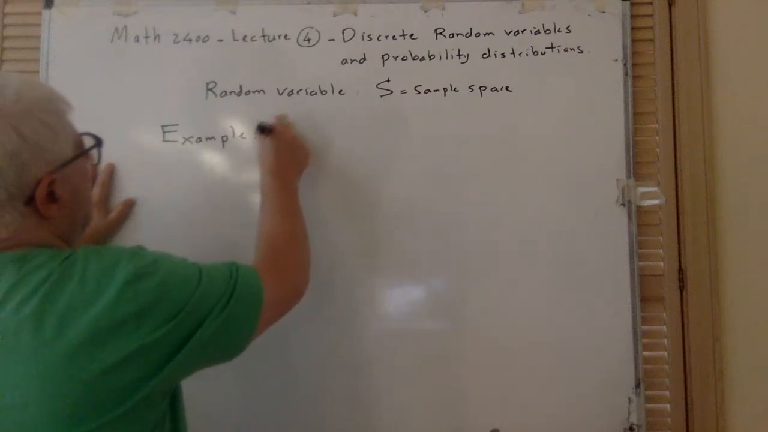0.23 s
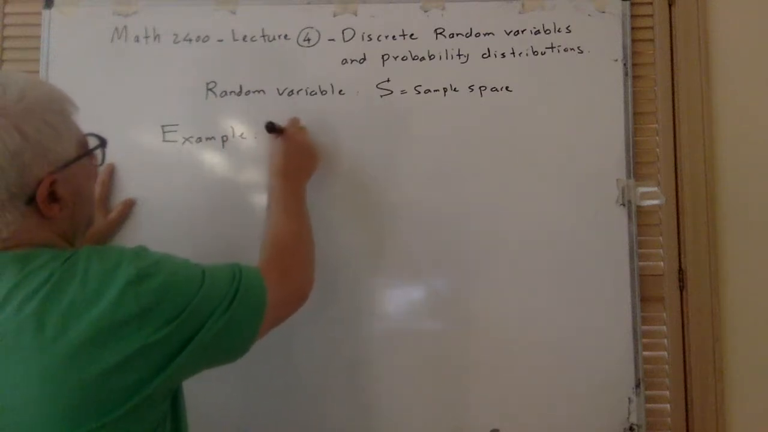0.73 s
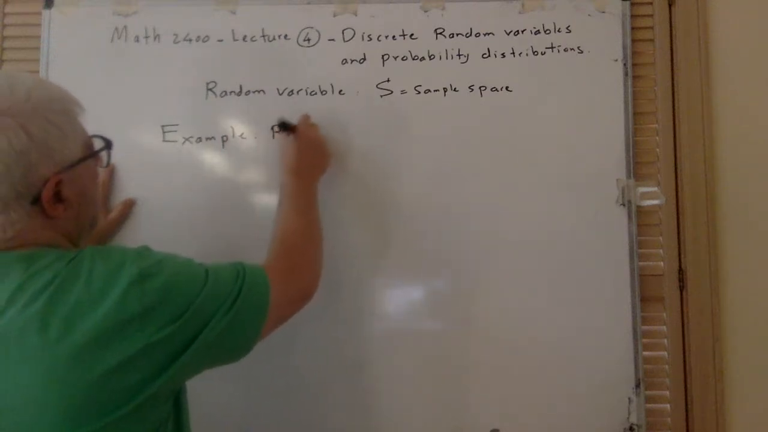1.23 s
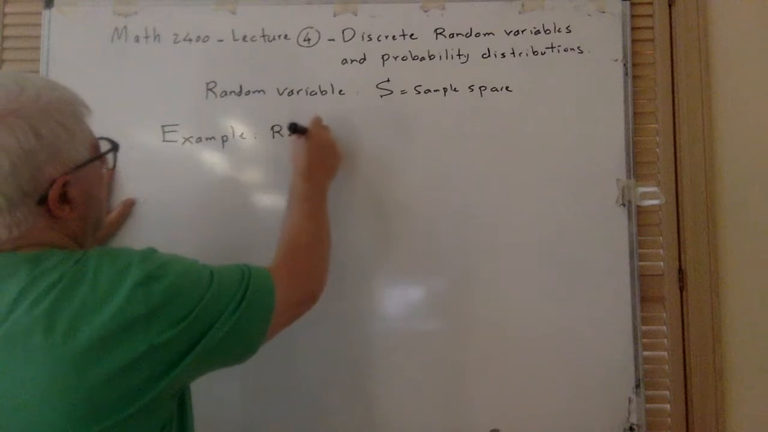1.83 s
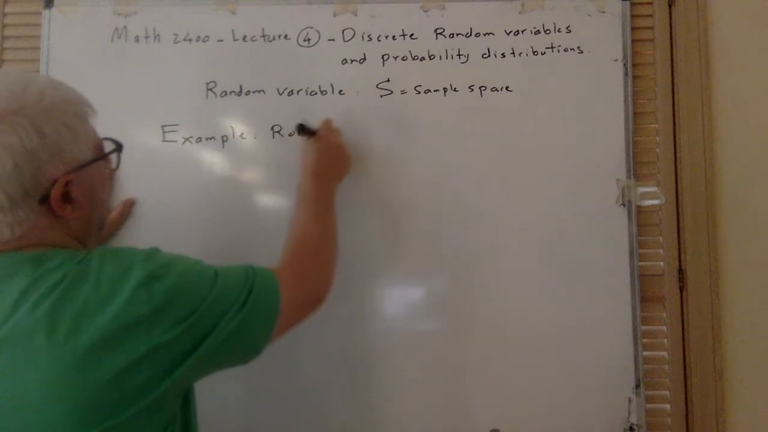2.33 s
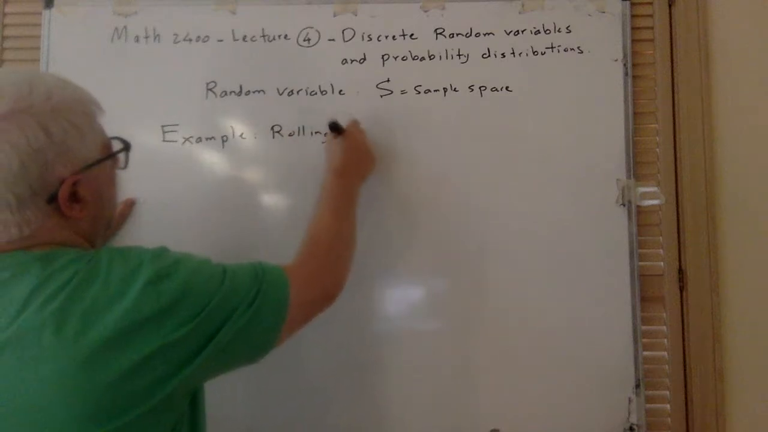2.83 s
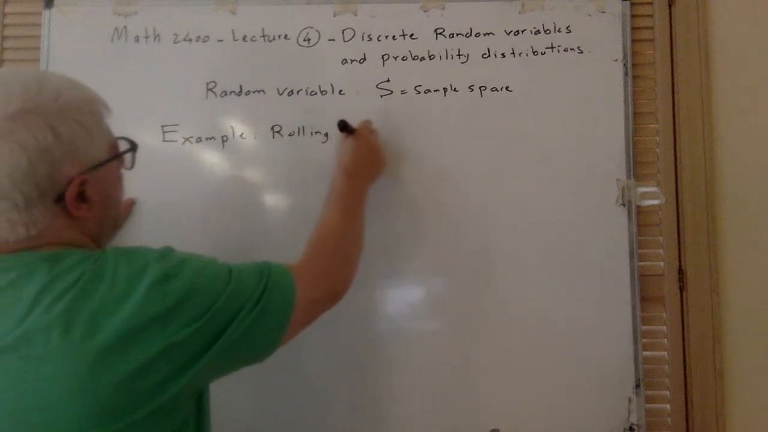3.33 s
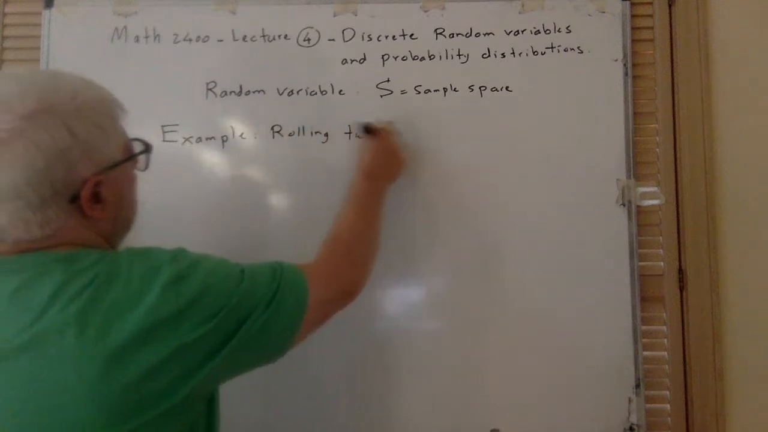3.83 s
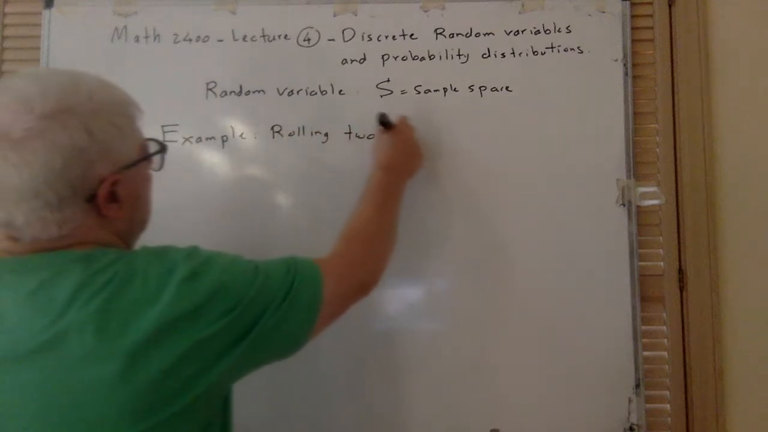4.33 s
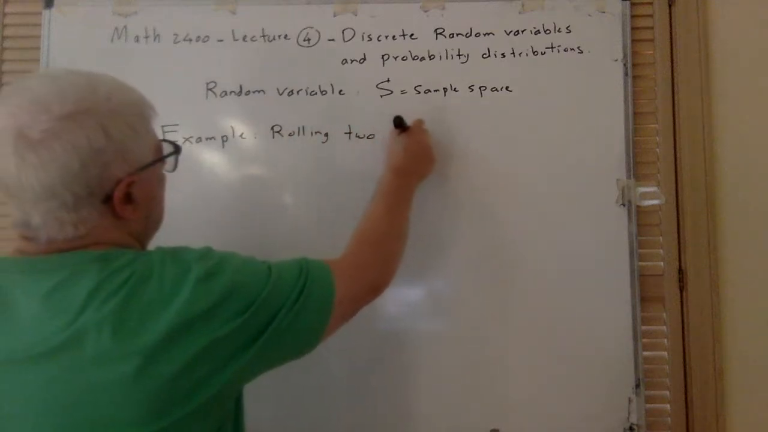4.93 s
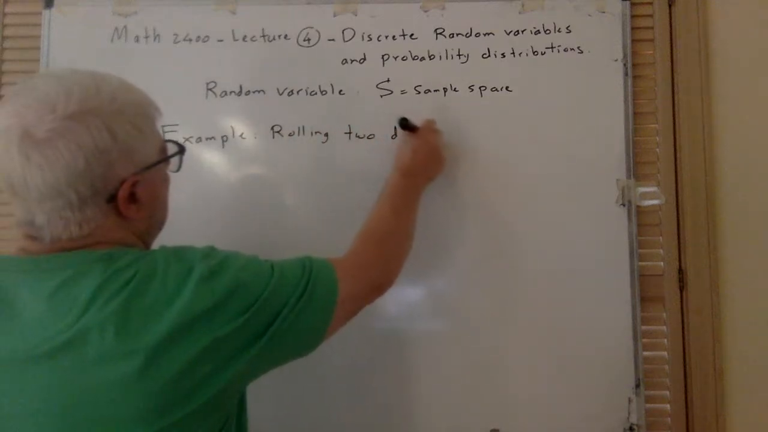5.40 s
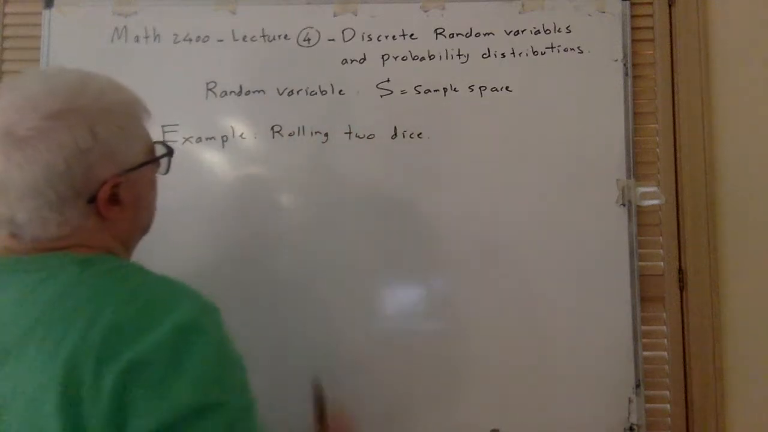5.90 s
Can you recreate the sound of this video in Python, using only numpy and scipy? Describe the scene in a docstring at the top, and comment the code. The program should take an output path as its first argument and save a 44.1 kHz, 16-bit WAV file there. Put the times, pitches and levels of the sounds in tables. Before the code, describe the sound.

A quiet classroom with soft, steady ventilation and faint low hums. From about 0.2 seconds a felt marker touches a whiteboard, faintly at first, with a light scuff and tiny squeak near 0.4. From 1.0 to 1.8 seconds come five quick, rounded low thumps, the strongest near 1.5, each with a short rubbing hiss. A near-lull follows, with only a very faint touch around 2.1. At 2.7 a firm knock with a scratch and high squeak starts a cluster lasting to 3.2, with ticks and low judders. A weak touch comes at 3.5, then a firmer clacking stroke at 4.0 with squeaks and a hum. Between 4.5 and 5.1 several strokes drag and scrape; a last solid thump, rub and judder falls at 5.4 to 5.6. The room settles, then a faint rustle at 6.0 leads to a bright, reverberant click at 6.1.

```python
"""Quiet classroom: a felt marker writes a few words on a wall-mounted whiteboard.
Each touch pushes the panel and rings its modes: a low thump, with a clack against the frame if firm.
Sliding felt hisses as filtered noise in strokes and scrapes; judders and squeaks are wavering sines.
Small ticks, a soft brush and one brighter click are short noise bands.
Steady coloured noise and low hums form the ventilation; decaying noise forms the room's tail."""
import sys
import numpy as np
from scipy import signal
from scipy.fft import rfft, irfft, next_fast_len
from scipy.io import wavfile

SR = 44100
rng = np.random.default_rng(int(sys.argv[2]) if len(sys.argv) > 2 else 0)


def transcribe(u):
    """Save the signal u as a 16-bit wav file named by the first command-line argument.

    u: samples, shape (n,) or (channels, n), limited to [-1, 1]; the rate is SR.
    q: integer samples, one column per channel.
    """
    v = np.clip(np.atleast_2d(u).T, -1, 1)
    q = np.round(v * 32767).astype(np.int16)
    wavfile.write(sys.argv[1], SR, q)


N = 271643
TIME = np.arange(N) / SR
AFTER = TIME[:SR]  # one second of time since a blow
HALF = AFTER[:SR // 2]  # the first half second of it, for the panel's modes

# Touches of the tip: start_s, thump_db, knock_db (re thump), clack_db (re thump),
# hold_s (ringing holds, then falls away quickly)
TOUCHES = [(0.182, -45.5, -28, -53, 0.1), (0.627, -41.5, -15.5, -42, 0.16),
           (0.983, -30.5, -15, -40.5, 0.12), (1.225, -31.5, -13, -37.5, 0.09),
           (1.458, -26.5, -12, -38, .13), (1.63, -37.5, -15.5, -28.5, 0.063),
           (1.775, -35.5, -25, -30.5, 0.13), (2.064, -61, -15, -31, 0.14), (2.663, -22.5, -12, -14, 0.18),
           (2.908, -25.5, -9.5, -39, 0.2), (3.083, -27, -15.5, -13.5, 0.15), (3.502, -39, -16.5, -28, 0.24),
           (3.957, -27, -9.5, -7.5, 0.19), (4.475, -44.5, -18, -21, 0.41), (4.679, -28.5, -9, -8.5, 0.17),
           (4.848, -31, -7.5, -3.5, 0.19), (5.09, -49.5, -3, -9.5, 0.047), (5.431, -26.5, -9.5, -7, 0.2)]


def undb(db):
    """Level to amplitude: 20 dB is a factor of ten."""
    return 10 ** (np.asarray(db) / 20)


def unit(x, size=None):
    """Normalisation: scale to rms 1 over the first size samples, or over all."""
    return x / np.sqrt(np.mean(x[:size] ** 2))


def fade(t60):
    """Exponential decay: 60 dB in t60 seconds."""
    return np.exp(-np.log(1000) * AFTER / t60)


def band(x, lo_hz, hi_hz, order=2):
    """Band limitation by a causal Butterworth band-pass."""
    edges = [lo_hz, min(hi_hz, SR / 2 - 1)]
    return signal.sosfilt(signal.butter(order, edges, "band", fs=SR, output="sos"), x)


def colour(x, points):
    """Spectral shaping by relative (Hz, dB) points on a log-frequency axis, scaled to rms 1."""
    hz, db = np.transpose(points)
    size = next_fast_len(len(x))
    f = np.maximum(np.fft.rfftfreq(size, 1 / SR), 1)
    gain = undb(np.interp(np.log(f), np.log(hz), db))
    return unit(irfft(rfft(x, size) * gain, size)[:len(x)])


def walk(rate, size):
    """Random modulation: normal values, rate per second, joined by straight lines."""
    steps = np.arange(size) * rate / SR
    return np.interp(steps, np.arange(size // 20), rng.standard_normal(size // 20))


def add(out, s, x):
    """Superposition: mix x into out from time s."""
    i = max(int(s * SR), 0)
    out[i:i + len(x)] += x[:N - i]


def room(x, t60, wet_db):
    """Reverberation: convolve with decaying noise whose build-up has a 12 ms time constant."""
    tail = rng.standard_normal(SR) * fade(t60) * (1 - np.exp(-AFTER / 0.012))
    return x + undb(wet_db) * signal.fftconvolve(x, tail / np.linalg.norm(tail))[:N]


def ventilation(air_db=-71, wander_db=0.5):
    """Flow noise: broadband air of slowly wandering level over narrow-band, wavering hums."""
    # Air spectrum: pitch_hz, level_db (relative)
    air_spectrum = [(20, -36), (50, -9), (130, -3.5), (280, -7.5), (400, -15.5), (620, -25.5),
                    (1050, -17.5), (1600, -24.5), (3000, -28), (6600, -31.5), (7600, -40), (14000, -39.5),
                    (15500, -55)]
    # Low hums: pitch_hz, level_db
    low_hums = [(141, -77), (232, -75.5), (478, -86.5)]
    air = colour(rng.standard_normal(N), air_spectrum) * undb(air_db + wander_db * walk(3.9, N))
    for hz, db in low_hums:
        air += undb(db) * unit(band(rng.standard_normal(N), hz - 5, hz + 5))
    return air


def stroke(s, length, db, attack_s=0.012, release_s=0.025):
    """Motion envelope: a slide gets up to speed linearly, holds, and stops exponentially."""
    rise = np.clip((TIME - s) / attack_s, 0, 1)
    return undb(db) * rise * np.exp(-np.maximum(TIME - s - length, 0) / release_s)


def brush():
    """Friction noise: a brief, soft, high rustle leading up to the click."""
    return unit(band(rng.standard_normal(N), 3200, 7700)) * stroke(s=5.985, length=0.1, db=-75)


def click(start_s=6.103, level_db=-53.5, t60=0.029):
    """Impulse response: a short noise snap excites a handful of bright resonances."""
    # Click resonances: pitch_hz, width_hz, level_db (relative)
    resonances = [(2560, 120, 3.5), (3350, 110, 6), (5040, 400, -5), (5860, 220, -1), (6780, 430, -12),
                  (7900, 700, -34)]
    out = np.zeros(N)
    snap = rng.standard_normal(SR) * fade(t60)
    ring = np.zeros(SR)
    for hz, width, db in resonances:
        ring += undb(db) * unit(band(snap, hz - width / 2, hz + width / 2, order=1))
    ring = band(ring, 1700, 9300, order=5)
    add(out, start_s, undb(level_db) * unit(ring, size=441))  # level of the first 10 ms
    return out


def ticks(tick_t60=0.034):
    """Contact impulses: tiny dry bursts of decaying band noise."""
    # Ticks: start_s, level_db (first 10 ms), centre_hz
    contacts = [(.434, -82.5, 2150), (.682, -74, 4630), (1.518, -82.5, 7650), (1.564, -76, 4500),
                (1.683, -75, 4930), (2.929, -92, 5430), (3.006, -67.5, 3700), (3.546, -78, 4430)]
    out = np.zeros(N)
    for s, db, hz in contacts:
        burst = band(rng.standard_normal(SR) * fade(tick_t60), hz * 0.58, hz * 1.2)
        add(out, s, undb(db) * unit(burst, size=441))
    return out


def stick_slip(s, length, hz, db, waver, rough):
    """Stick-slip oscillation: the tip catches and slips, unsteady in pitch and strength; s is mid-tone."""
    out, size = np.zeros(N), int(length * SR)
    pitch = hz * (1 + waver * walk(600, SR)[:size])
    phase = 2 * np.pi * np.cumsum(pitch) / SR
    tone = np.sin(phase) * (1 + rough * walk(300, SR)[:size])
    add(out, s - length / 2, undb(db) * unit(tone) * np.hanning(size))
    return out


def squeaks():
    """High stick-slip: clear little squeaks with a slight waver."""
    # Squeaks: middle_s, length_s, pitch_hz, level_db (before the swell)
    squeak_rows = [(0.437, 0.012, 2050, -67), (2.684, 0.011, 5270, -62.5), (2.692, 0.052, 7100, -72.5),
                   (3.986, 0.012, 7060, -64.5), (4.04, 0.021, 4290, -65), (4.148, .02, 2120, -59.5),
                   (4.984, 0.012, 3350, -63), (5.043, 0.032, 1610, -61), (5.51, 0.017, 5900, -64.5),
                   (5.503, 0.022, 10300, -74.5)]
    return sum(stick_slip(*row, waver=0.012, rough=0.67) for row in squeak_rows)


def judders():
    """Low stick-slip: the juddering tip sets the panel humming."""
    # Judders: middle_s, length_s, pitch_hz, level_db (before the swell)
    judder_rows = [(0.228, 0.057, 305, -63.5), (0.679, 0.043, 333, -52), (1.57, 0.032, 335, -46.5),
                   (1.831, 0.034, 301, -45.5), (2.983, 0.028, 341, -40.5), (3.021, 0.031, 328, -41.5),
                   (4.085, 0.078, 303, -39.5), (4.966, 0.055, 302.2, -40.5), (5.541, 0.05, 313, -37),
                   (5.623, 0.042, 315, -43.5)]
    return sum(stick_slip(*row, waver=0.071, rough=0.48) for row in judder_rows)


def scrapes(spread=1.125, grain_db=3.0):
    """Resonant friction: dense uneven slips of the felt ring one region of the panel."""
    # Scratchy drags: middle_s, length_s, centre_hz, level_db (before the swell)
    drags = [(0.338, 0.11, 1620, -84), (0.48, 0.22, 2780, -80), (0.704, .18, 1020, -68),
             (1.48, 0.046, 965, -57.5), (1.796, 0.027, 1060, -59.5), (1.826, 0.14, 1150, -65.5),
             (2.269, 0.25, 2110, -80.5), (2.787, 0.1, 1100, -50.5), (3.174, 0.09, 1030, -51),
             (4.192, 0.13, 1830, -63), (4.761, 0.064, 1350, -53), (4.973, 0.12, 1740, -54),
             (5.102, 0.04, 1325, -53.5)]
    out = np.zeros(N)
    for s, length, hz, db in drags:
        size = int(length * SR)
        slips = rng.standard_normal(SR) * undb(grain_db * walk(388.7, SR))
        drag = unit(band(slips, hz / spread, hz * spread)[:size])
        add(out, s - length / 2, undb(db) * drag * np.hanning(size))
    return out


def rubbing(grain_db=3.0, flutter_db=0.9, top_db=-19, top_follow=0.95):
    """Friction noise: fibres let go in countless slips; the finest hiss grows more slowly with pressure."""
    # Strokes of the felt along the board: start_s, length_s, level_db
    slides = [(.23, 0.047, -80), (0.423, 0.046, -76), (.675, 0.052, -75.5), (0.992, 0.075, -76.5),
              (1.245, 0.086, -76.5), (1.496, 0.093, -71.5), (1.675, 0.034, -74.5), (1.778, 0.091, -74),
              (2.661, 0.065, -62.5), (2.919, 0.052, -67), (3.003, .03, -67), (3.077, 0.07, -65.5),
              (3.53, 0.095, -79), (3.964, 0.11, -65), (4.13, 0.029, -65.5), (4.673, 0.13, -68),
              (4.838, 0.081, -63), (4.961, 0.075, -65), (5.439, 0.089, -64), (5.493, 0.057, -61.5)]
    # Spectrum of the rubbing: pitch_hz, level_db (relative)
    rub_spectrum = [(400, 4.5), (700, 10.5), (1200, 9.5), (2200, 0.5), (3500, 0.5), (5200, -2.5),
                    (6900, -6), (7700, -19), (15000, -29.5)]
    flutter = undb(flutter_db * walk(45, N))
    slips = rng.standard_normal(N) * undb(grain_db * walk(1700, N)) * flutter
    pressure = np.max([stroke(*row) for row in slides], axis=0)
    peak = pressure.max()
    fine_pressure = peak * (pressure / peak) ** top_follow
    fine = unit(band(rng.standard_normal(N), 6900, 15000)) * undb(top_db) * fine_pressure
    return colour(slips, rub_spectrum) * pressure + fine


def ringing(hz, t60, rise_cycles=0.61, frame_lag_s=0.003072):
    """Modal decay: one damped sine per mode; high ones start later, when the panel meets its frame."""
    lag = frame_lag_s * (hz[:, None] > 430)
    t = np.maximum(HALF - lag, 0).astype(np.float32)
    cycles = t * hz[:, None].astype(np.float32)
    onset = np.sin(np.pi / 2 * np.minimum(cycles / rise_cycles, 1)) ** 2
    decay = np.exp(-t * (np.log(1000) / t60[:, None]).astype(np.float32))
    return np.sin(2 * np.pi * cycles) * onset * decay


def force(hz, sway=0.15, crack_db=-6, crack_growth=1.283):
    """Contact spectrum: soft felt moves only low modes; a quick hard touch sways less and cracks more."""
    corners_hz = [95, 165, 225, 335, 540, 950, 1700, 2300]
    gains = []
    for _, thump, knock, clack, _ in TOUCHES:
        sway_db = -sway * (clack + 36)
        top_db = crack_db + crack_growth * clack  # the top grows faster than the clack
        corners_db = [sway_db, 0, 0, knock, knock, clack, clack, top_db]
        gains.append(undb(thump + np.interp(np.log(hz), np.log(corners_hz), corners_db)))
    return np.array(gains)


def panel_pushes(push_db=-8.0):
    """Forced response: the panel gives way under the tip and first cracks against the frame."""
    # Push components: pitch_hz, level_db (re push_db), t60_s
    push_modes = [(119.7, -6.5, 0.072), (181.4, 9, 0.092), (345.3, 5, 0.15), (987, -1, 0.024),
                  (1286, 2, 0.047), (1744, -5, 0.043), (2900, 2.5, 0.024)]
    hz, db, t60 = np.transpose(push_modes)
    return (force(hz) * undb(db + push_db)) @ ringing(hz, t60)


def main_modes(main_db=-8.5, scatter_db=2.0):
    """Modal excitation: touches lie close together, so each drives the main modes nearly alike."""
    # Main modes of the panel: pitch_hz, level_db (re main_db), t60_s
    panel_modes = [(76.4, -17, 0.56), (121.9, -6.5, 0.49), (161.6, -2, 0.48), (182, -4, 0.16),
                   (230.5, -3, 0.38), (265.3, -1, 0.39), (300, 2, 1), (335, -3, 1), (377, -5, 0.69),
                   (414, 0.5, 0.19), (484, -12, 0.44), (1002, -16, 1), (1292, -6.5, 0.55),
                   (1473, -14.5, 0.4), (1547, -13, .6), (1710, -7.5, 0.19), (1803, -8, 0.24),
                   (2150, -13.5, 0.35), (2520, -5, 0.32), (2640, -6.5, 0.31), (2831, -6.5, 0.19),
                   (3110, -12, 0.47)]
    hz, db, t60 = np.transpose(panel_modes)
    spot = undb(scatter_db * rng.standard_normal((len(TOUCHES), len(hz))))
    return (force(hz) * undb(db + main_db) * spot) @ ringing(hz, t60)


def small_modes(crowd_db=-7.5, count=440):
    """Modal density: a plate's small modes are spaced about evenly in frequency, with random signs."""
    # Crowd of small modes, interpolated: pitch_hz, level_db (of each, re crowd_db), t60_s
    crowd_curve = [(70.32, -34, 0.94), (180, -12.5, 0.33), (335, -7, 0.96), (539, -21.5, 0.64),
                   (695, -21.5, 0.78), (857, -19.5, 0.71), (1190, -17.5, 0.6), (1760, -20.5, 0.8),
                   (2020, -22, 0.86), (3250, -18.5, 0.29), (3360, -19.5, 0.13), (3803, -42.5, 0.13)]
    grid_hz, db, t60 = np.transpose(crowd_curve)
    hz = grid_hz[0] + (grid_hz[-1] - grid_hz[0]) * (np.arange(count) + rng.random(count)) / count
    sign = np.sign(rng.standard_normal((len(TOUCHES), count)))
    crowd = ringing(hz, np.interp(hz, grid_hz, t60))
    # the clack is loudest before it has spread over the panel
    crowd[hz > 750] *= 1 + 0.55 * np.exp(-(HALF / 0.017) ** 2)
    return (force(hz) * undb(np.interp(hz, grid_hz, db) + crowd_db) * sign) @ crowd


def taps(radiate_hz=75, top_hz=3900):
    """Impact: each touch pushes the panel and rings its modes, which hold a moment and then drop away fast."""
    # Returns of the push from nearby walls: delay_s, level_db (re push)
    wall_echoes = [(0.016, -25.5), (0.042, -15.5), (0.055, -11), (0.098, -25)]
    pushes = panel_pushes()
    rings = main_modes() + small_modes()
    out = np.zeros(N)
    for (s, *_, hold_s), push, ring in zip(TOUCHES, pushes, rings):
        add(out, s, push + ring * np.exp(-(HALF / hold_s) ** 5.6))
        for delay, echo_db in wall_echoes:
            add(out, s + delay, undb(echo_db) * push)
    # the panel radiates almost no deep bass, and the taps carry nothing above about 3.9 kHz
    out = signal.sosfilt(signal.butter(3, radiate_hz, "high", fs=SR, output="sos"), out)
    return signal.sosfilt(signal.butter(6, top_hz, fs=SR, output="sos"), out)


def scene():
    """Superposition of sources: each group excites the room with its own decay and wet level."""
    board = room(taps() + judders() + scrapes(), t60=0.95, wet_db=-16.5)
    tip = room(squeaks() + ticks(), t60=0.99, wet_db=-6.0)
    felt = room(rubbing(), t60=1.68, wet_db=-1.5)
    bright_click = room(click(), t60=1.0, wet_db=5.0)
    return (board + tip + felt + brush() + bright_click + ventilation())[None]


def record(dry, top_hz=15200):
    """Band limitation: the recorder cuts the top with a steep elliptic low-pass."""
    return signal.sosfilt(signal.ellip(8, 0.2, 70, top_hz, fs=SR, output="sos"), dry)


dry = scene()
out = record(dry)
transcribe(out)
```